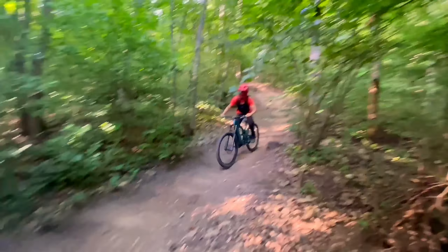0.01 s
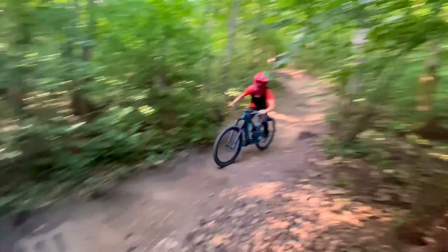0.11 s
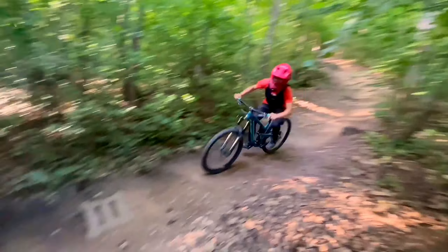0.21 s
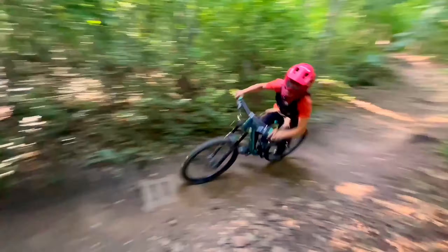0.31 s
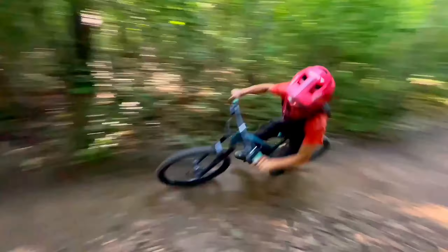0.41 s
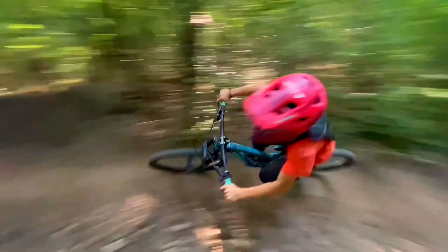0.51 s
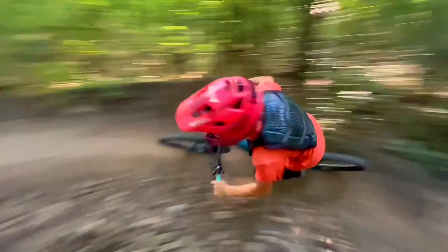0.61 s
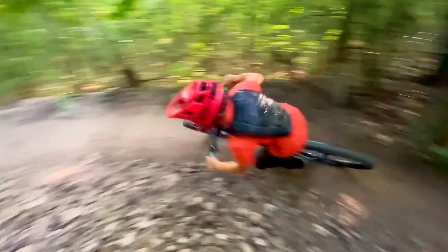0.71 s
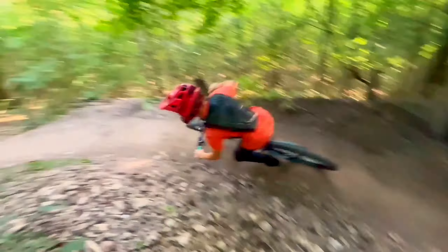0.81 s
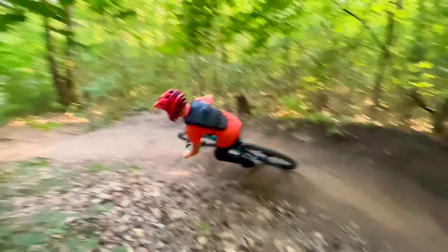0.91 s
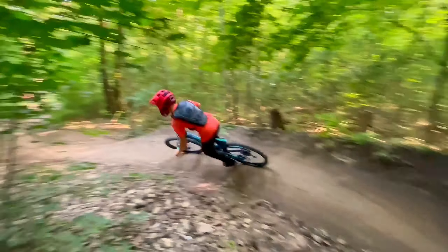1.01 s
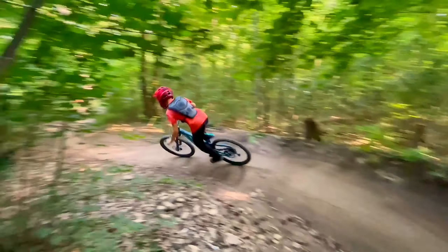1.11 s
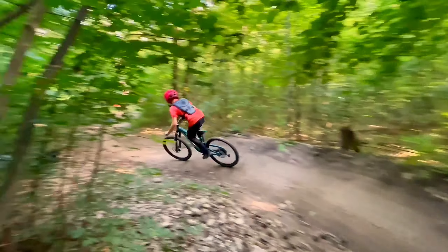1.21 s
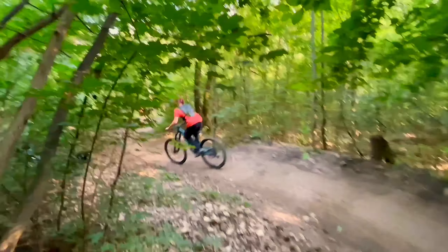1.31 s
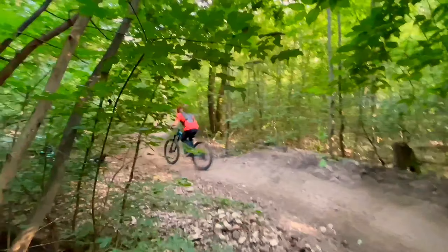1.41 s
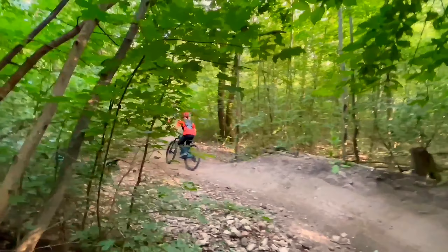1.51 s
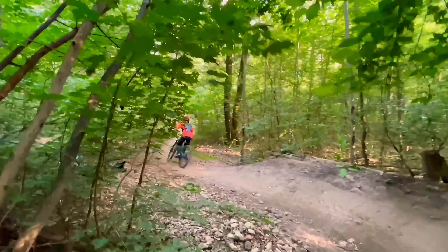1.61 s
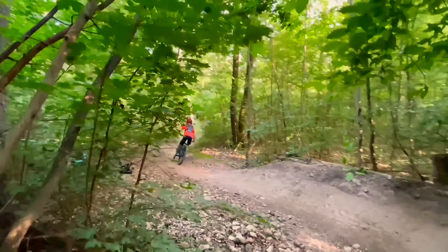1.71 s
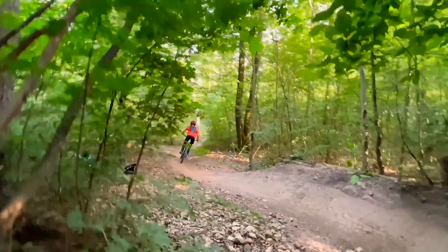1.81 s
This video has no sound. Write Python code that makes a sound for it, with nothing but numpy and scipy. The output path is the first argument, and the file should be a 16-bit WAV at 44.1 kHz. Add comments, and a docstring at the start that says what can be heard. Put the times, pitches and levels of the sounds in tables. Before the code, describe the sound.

A mountain bike nears on a dirt trail, faint tyre crackle and chain rattle growing from 0 to 0.4 s. At 0.42-0.6 s it sweeps close by with sharp clatter, deep thuds, wind buffeting and a bright burst of grit. Tyres roar and hum, a mid-pitched rasp scrubs through the turn from 0.7 to 1.09 s, then cuts off; light ticks, grit and soft rolling fade into faint woodland echo by 1.9 s.

```python
"""A mountain bike rushes past close by on a dirt forest trail and carves away through a banked turn.
Air buffets the microphone as it nears; tyres of coloured random clicks roll, ringing bursts clatter over bumps,
pitch-dropping sines thud, and showers of clicks fling grit as it passes. A pulse train of knobs hums and a
resonant rasp scrubs in the turn; the tyres go light for a moment, land and roll off. Trees scatter a faint echo."""
import sys
import numpy as np
from scipy import signal
from scipy.fft import rfft, irfft
from scipy.io import wavfile

SR = 44100
rng = np.random.default_rng(int(sys.argv[2]) if len(sys.argv) > 2 else 0)


def wav_record(signal):
    """Record a signal, one row per channel, as 16-bit PCM in the file named by sys.argv[1]."""
    frames = np.transpose(np.atleast_2d(signal))
    bounded = np.clip(frames, -1, 1)
    # unit amplitude maps onto the largest positive 16-bit level
    quanta = np.round(bounded * 32767).astype(np.int16)
    wavfile.write(sys.argv[1], SR, quanta)


N = 83790
T = np.arange(N) / SR  # seconds


def amp(db):
    """Decibels to gain."""
    return 10 ** (np.asarray(db) / 20)


def unit(x):
    """Scales to rms 1."""
    return x / np.sqrt(np.mean(x ** 2) + 1e-20)


def read(points, hz):
    """Reads a table on a log-frequency axis."""
    f, value = np.transpose(points)
    return np.interp(np.log(hz + 1), np.log(f), value)


def curve(table, column):
    """One column of a table, joined by straight lines over time."""
    rows = np.array(table)
    return np.interp(T, rows[:, 0], rows[:, column])


def wander(hz):
    """Random drift of rms 1 that fades out above the given rate."""
    f = np.fft.rfftfreq(N, 1 / SR)
    smooth = rfft(rng.standard_normal(N)) / (1 + (f / hz) ** 4)
    return unit(irfft(smooth, N))


def colour(x, points):
    """Causal minimum-phase filter of unit energy, so the points set only the shape of the spectrum."""
    log_gain = np.log(amp(read(points, abs(np.fft.fftfreq(4096, 1 / SR)))))
    taps = np.fft.ifft(np.exp(np.conj(signal.hilbert(log_gain)))).real[:2048]
    taps = taps / np.linalg.norm(taps)
    return signal.fftconvolve(x, taps[None], axes=1)[:, :N]


def pair(x, lag_s=0):
    """Two unrelated signals become a microphone pair: alike in the bass, leaning left, the right one late above it."""
    # Each row: frequency in Hz, likeness of left and right from 0 to 1; near mono at the very top
    likeness = [(330, .99), (700, .75), (1700, .35), (3500, .6), (5000, .15), (10500, .2), (12500, .95)]
    # Each row: frequency in Hz, left over right in dB
    balance = [(60, 3.5), (700, 5.5), (1300, 6.5), (2300, 0.5), (4400, 6), (12500, 0)]
    f = np.fft.rfftfreq(2 * N, 1 / SR)
    a, b = rfft(x, 2 * N)
    same = np.clip(read(likeness, f), 0, 1)
    side = amp(read(balance, f) / 2)
    lag_share = np.interp(f, [700, 2000, 10000, 12000], [0, 1, 1, 0])  # the lag spares bass and top
    late = np.exp(-2j * np.pi * f * lag_s * lag_share)
    left = a * side
    right = late * (same * a + np.sqrt(1 - same ** 2) * b) / side
    return irfft(np.array([left, right]))[:, :N]


MIC_LAG_S = 0.000465


def grains(per_s, spread_db):
    """Random clicks of uneven size, reaching both microphones with unrelated sign."""
    size = amp(spread_db * np.minimum(rng.exponential(1, N), 4))
    clicks = size * (rng.random(N) < per_s / SR)
    return unit(clicks * rng.choice([-1, 1], (2, N)))


def burst(start, length, rise, decay, tail_db, tail):
    """A quick rise, a short hold, a fast decay and a weaker slow tail."""
    age = np.maximum(T - start, 0)
    late = np.maximum(age - length, 0)
    share = min(amp(tail_db), 1)
    fall = (1 - share) * np.exp(-late / decay) + share * np.exp(-late / tail)
    return np.minimum(age / rise, 1) * fall


def wind():
    """Air on the microphone: a lumpy low rumble of coloured noise, strongest as the rider sweeps by."""
    # How hard the air blows. Each row: time in seconds, level in dB
    gust_level = [(0, -58), (.08, -46), (.3, -41.5), (.48, -27.5), (.62, -38), (.7, -48), (.88, -50),
                  (1.08, -42.5), (1.4, -52.5), (1.9, -55)]
    # Spectrum of the rumble. Each row: frequency in Hz, relative level in dB per Hz
    buffet = [(20, -33), (38, -8.5), (65, 4), (120, -7), (600, -54.5)]
    gusts = rng.standard_normal((2, N)) * amp(curve(gust_level, 1) + 2 * wander(hz=6.1))
    return pair(colour(gusts, buffet))


def tyres():
    """Dirt drums on the casing, the tread scrubs, and grit and leaves crackle in clumps."""
    # Tyres on the ground. Each row: time in seconds, casing roar in dB, tread scrub in dB, grit crackle in dB
    roll = [(0, -54.5, -44, -67.5), (.16, -47, -59.5, -55), (.3, -49, -45.5, -45), (.4, -38.5, -36, -46.5),
            (.53, -33.5, -36, -36.5), (.6, -25.5, -29.5, -39), (.7, -33, -30.5, -40.5),
            (.77, -33, -37.5, -43.5), (.9, -35, -36, -47.5), (1.0, -30, -30, -42.5),
            (1.088, -30, -32.5, -44), (1.11, -45, -46.5, -46.5), (1.165, -47, -37.5, -43.5),
            (1.2, -49, -46, -45), (1.28, -42.5, -37.5, -41), (1.44, -54.5, -46.5, -55),
            (1.48, -46, -42, -49.5), (1.68, -45.5, -43, -51.5), (1.9, -58, -49.5, -49.5)]
    # Spectra of the three layers. Each row: frequency in Hz, relative level in dB per Hz
    casing_colour = [(60, -26), (140, -4), (270, -2), (480, -5.5), (620, -20.5), (3000, -68.5)]
    tread_colour = [(250, -11.5), (640, -8.5), (880, 0), (1060, -5.5), (1500, -1), (2000, -7.5),
                    (3100, -12.5), (4500, -16), (8000, -30)]
    grit_colour = [(800, -30), (2500, 4.5), (3600, -11.5), (5000, 3.5), (8500, 4.5), (10300, -5),
                   (12000, 1.5), (14500, -10.5), (15500, -12)]
    ground = wander(hz=39.5)  # one roughness moves all three layers
    casing = grains(per_s=4000, spread_db=2.5) * amp(curve(roll, 1) + 0.8 * ground)
    tread = grains(per_s=5000, spread_db=2.0) * amp(curve(roll, 2) + 1.26 * ground)
    grit = grains(per_s=10000, spread_db=1.5) * amp(curve(roll, 3) + ground + wander(hz=250))
    layers = colour(casing, casing_colour) + colour(tread, tread_colour) + colour(grit, grit_colour)
    return pair(layers, lag_s=MIC_LAG_S)


def clatter():
    """Each bump gives one sharp strike and a cluster of chain ticks; the struck part rings briefly, the frame longer."""
    # Chain and frame over bumps. Each row: start in seconds, level in dB, length in seconds, ring pitch in Hz
    knocks = [(.052, -38, 0.0071, 2060), (0.095, -38, 0.0059, 1040), (.147, -41, 0.0064, 610),
              (0.185, -30.5, 0.0027, 662), (0.2184, -32.5, 0.0057, 640), (0.23, -38, 0.0098, 637),
              (0.271, -31, 0.0018, 3140), (.314, -28, 0.012, 1500), (.363, -30, 0.008, 1830),
              (0.427, -20.5, 0.0044, 318), (.463, -19, 0.0042, 1970), (0.491, -28.5, 0.0018, 2010),
              (0.5202, -25, 0.0041, 1330), (0.534, -29, 0.0019, 2580), (0.546, -20.5, 0.0021, 1450),
              (0.572, -19, 0.0021, 1410), (0.59, -24.5, 0.0027, 1680), (0.599, -23, 0.0086, 450),
              (1.211, -35.5, 0.013, 1300), (1.224, -39.5, 0.018, 780), (1.408, -45.5, 0.015, 1390),
              (1.46, -42.5, 0.0078, 1860)]
    # What the frame rings with at every knock. Each row: pitch in Hz, level in dB
    frame_modes = [(645, -7), (1545, 4), (2190, -24)]
    # Spectrum of the clatter. Each row: frequency in Hz, relative level in dB per Hz
    frame_colour = [(80, -22), (300, 1), (1750, 1.5), (4300, -10.5), (6000, -21), (14000, -28)]
    rise_s, decay_s, tail_db, tail_s = 0.000511, 0.0018, -7.5, 0.029
    strike_db, ring_db = 10.5, 7.5
    ring_width_hz, mode_width_hz = 88, 30  # the narrower, the longer it rings
    out = np.zeros((2, N))
    for start, db, length, hz in knocks:
        ticks = grains(per_s=4500, spread_db=0.5)
        contacts = ticks * burst(start, length, rise_s, decay_s, tail_db, tail_s)
        contacts[:, round((start + 2 * rise_s) * SR)] += amp(strike_db)
        ring = signal.lfilter(*signal.iirpeak(hz, hz / ring_width_hz, SR), contacts)
        out += amp(db) * (contacts + amp(ring_db) * ring)
    frame = np.zeros((2, N))
    for hz, db in frame_modes:
        frame += amp(db) * signal.lfilter(*signal.iirpeak(hz, hz / mode_width_hz, SR), out)
    return pair(colour(out + frame, frame_colour), lag_s=MIC_LAG_S)


def thuds():
    """A tyre squashes into a bump: a short low boom whose pitch drops."""
    # Each row: start in seconds, level in dB, final pitch in Hz
    impacts = [(0.188, -24.5, 66), (0.233, -25, 69), (0.33, -16, 56), (0.368, -21, 76.4), (.431, -10.5, 98),
               (0.466, -30, 57.5), (0.539, -9.5, 233), (0.557, -16, 174.5), (0.572, -7.5, 71.4),
               (0.654, -17, 343), (1.468, -41.5, 208)]
    rise_s, decay_s = 0.0025, 0.0091
    bend_hz, bend_s = 99, 0.004  # how far above the final pitch it starts, and how fast it sinks
    out = np.zeros(N)
    for start, db, hz in impacts:
        age = np.maximum(T - start, 0)
        turns = hz * age + bend_hz * bend_s * (1 - np.exp(-age / bend_s))
        envelope = np.minimum(age / rise_s, 1) * np.exp(-age / decay_s)
        out += amp(db) * np.sin(2 * np.pi * turns) * envelope
    return out * amp([[1.5], [-1.5]])  # leans 3 dB left


def spray():
    """Bright showers of grit thrown off the rear tyre: dense clicks under short bursts."""
    # Dirt flung by the rear tyre. Each row: start in seconds, level in dB, length in seconds
    sprays = [(0.423, -36.5, .002), (0.569, -23, 0.0085), (1.27, -44.5, 0.05), (1.406, -44, 0.016),
              (1.466, -49, .004)]
    # Spectrum of the showers. Each row: frequency in Hz, relative level in dB per Hz
    spray_colour = [(500, -24), (2000, -1), (8500, 10.5), (10500, 0.5), (13000, 6), (16000, -12)]
    rise_s, decay_s, tail_db, tail_s = 0.0044, 0.009, -5, 0.056
    level = np.zeros(N)
    for start, db, length in sprays:
        level += amp(db) * burst(start, length, rise_s, decay_s, tail_db, tail_s)
    shower = grains(per_s=12000, spread_db=2.5)
    return pair(colour(shower * level, spray_colour))


def knob_hum():
    """Tread knobs slap the ground in an uneven train that slows as the bike draws away."""
    # Knobs meeting the ground. Each row: time in seconds, hum level in dB
    hum_level = [(.55, -56), (.66, -35.5), (.73, -47), (.8, -33), (1.0, -42.5), (1.15, -61), (1.44, -60),
                 (1.475, -40.5), (1.53, -61), (1.68, -49), (1.9, -61.5)]
    # Spectrum of the hum. Each row: frequency in Hz, relative level in dB per Hz
    hum_colour = [(100, -5), (260, 2), (480, -16.5), (1400, -25), (3000, -38)]
    near_per_s, far_per_s, passed_s, slowing_s = 345, 240, 0.48, 0.12
    slowing = np.exp(-np.maximum(T - passed_s, 0) / slowing_s)
    rate = far_per_s + (near_per_s - far_per_s) * slowing
    turns = np.cumsum(rate * (1 + 0.07 * wander(hz=87.9))) / SR
    slaps = np.diff(np.floor(turns), prepend=0)  # one pulse for every whole turn of the count
    slaps = slaps * (1 + 0.17 * rng.standard_normal((2, N)))
    return pair(colour(unit(slaps - slaps.mean()) * amp(curve(hum_level, 1)), hum_colour))


def carve():
    """Tiny slips of the side knobs in the banked turn ring one broad resonance that swells, sinks and stops."""
    start_s, full_s, end_s, release_s = 0.71, 0.84, 1.09, 0.0023  # stops as the tyres go light
    level_db, pitch_hz, sag_hz_per_s, width_hz = -32.5, 1526, 210, 390  # pitch at full swell
    swell = np.clip((T - start_s) / (full_s - start_s), 0, 1)
    release = np.exp(-np.maximum(T - end_s, 0) / release_s)
    turn = np.exp(2j * np.pi * np.cumsum(pitch_hz - sag_hz_per_s * (T - full_s)) / SR)
    # shift the slips down by the moving pitch, lowpass, shift back: a band that follows the pitch
    slips = grains(per_s=9000, spread_db=0) / turn
    lowpass = signal.butter(2, width_hz / 2, fs=SR)
    rasp = (turn * signal.lfilter(*lowpass, slips)).real
    return pair(amp(level_db) * swell * release * unit(rasp))


def forest(x):
    """Faint scatter from trunks and leaves: a decaying noise tail."""
    level_db, decay_s = -16, 0.036
    tail = rng.standard_normal((2, N)) * np.exp(-T / decay_s)
    tail = tail / np.linalg.norm(tail[0])
    return amp(level_db) * signal.fftconvolve(x, tail, axes=1)[:, :N]


def scene():
    """The bike, its echo among the trees, the thuds and the air."""
    air = wind()
    bike = tyres() + clatter() + spray() + knob_hum() + carve()
    return air + bike + forest(bike) + thuds()


def record(dry):
    """A narrow dip of the microphone in the treble, then the recorder's band limit."""
    notch_hz, notch_q, edge_hz = 7450, 12, 15500
    heard = signal.lfilter(*signal.iirnotch(notch_hz, notch_q, SR), dry)
    lowpass = signal.firwin(511, edge_hz, window=("kaiser", 9), fs=SR)
    return signal.oaconvolve(heard, lowpass[None], "same")


dry = scene()
out = record(dry)
wav_record(out)
```